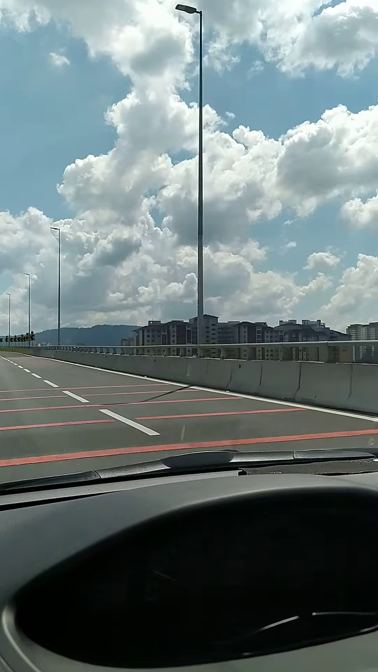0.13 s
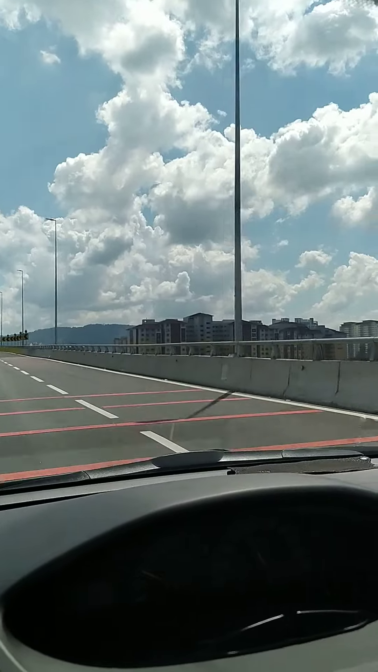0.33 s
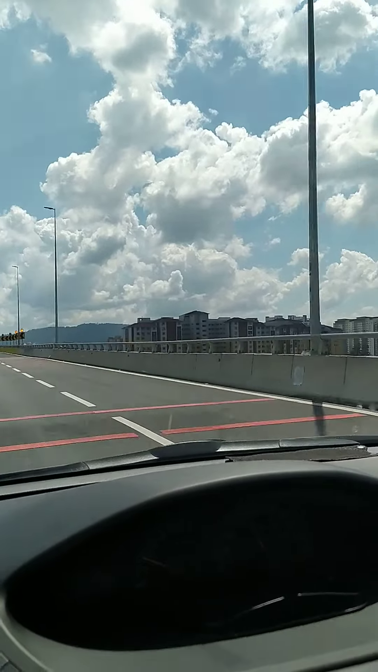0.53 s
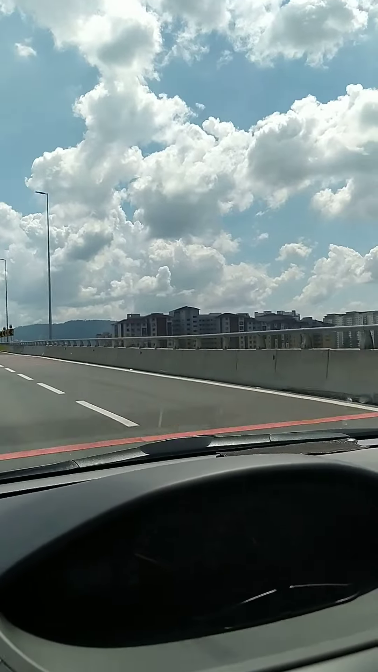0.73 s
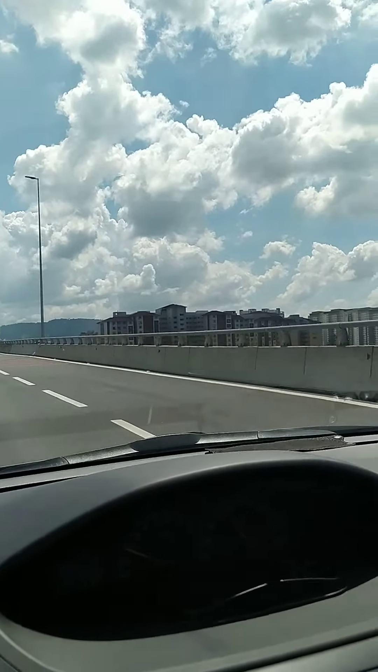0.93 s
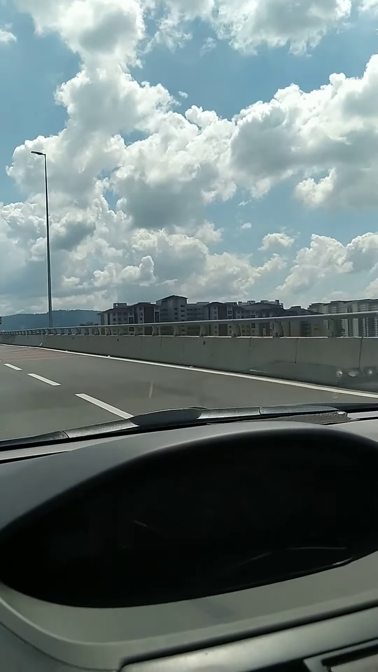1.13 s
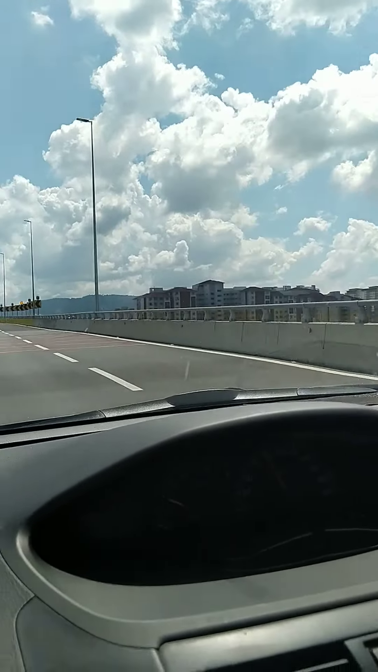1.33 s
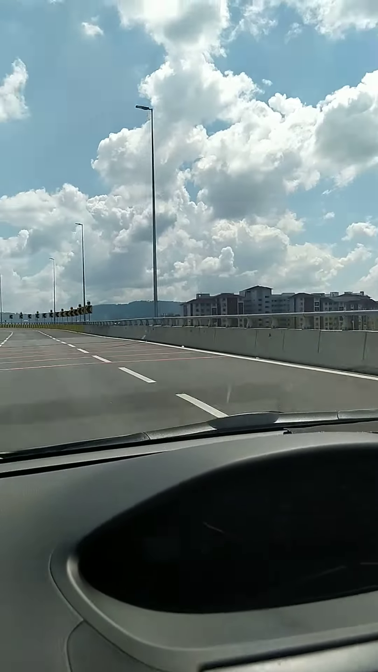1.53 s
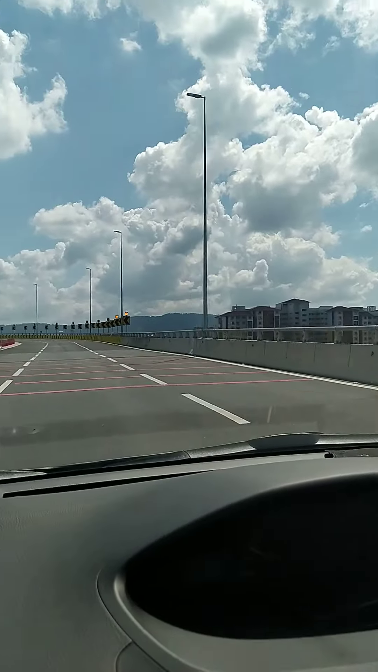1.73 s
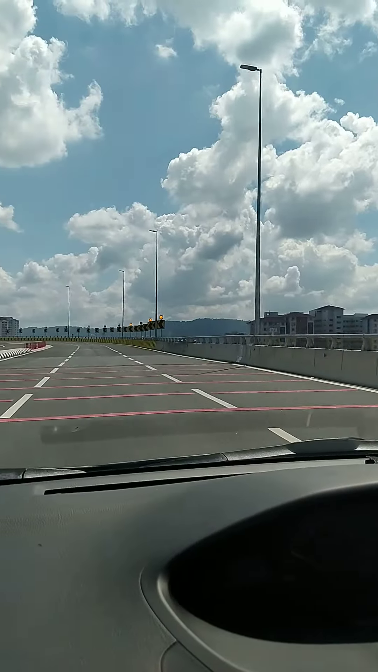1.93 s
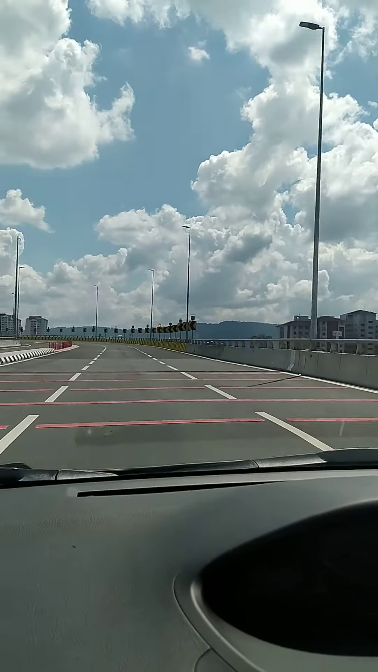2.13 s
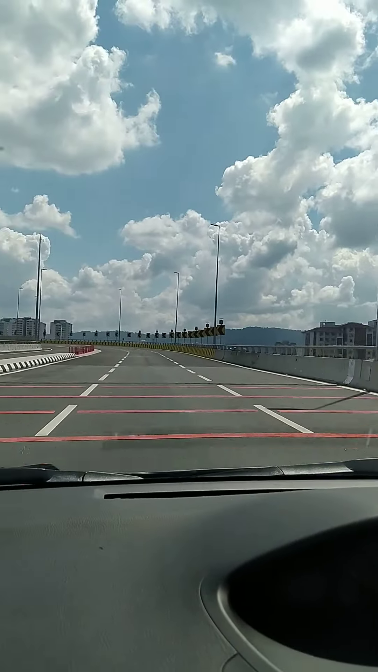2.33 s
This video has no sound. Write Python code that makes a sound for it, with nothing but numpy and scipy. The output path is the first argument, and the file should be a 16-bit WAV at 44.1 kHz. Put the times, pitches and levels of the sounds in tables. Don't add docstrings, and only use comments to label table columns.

```python
import sys
import numpy as np
from scipy import signal
from scipy.fft import rfft, irfft, next_fast_len
from scipy.io import wavfile
from scipy.ndimage import uniform_filter1d

SR = 44100
rng = np.random.default_rng(int(sys.argv[2]) if len(sys.argv) > 2 else 0)


def elevation(decibels):
    levels = np.asarray(decibels, float)
    return 10 ** (levels / 20)


def dump(signal):
    limited = np.clip(np.atleast_2d(signal).T, -1, 1)
    pcm = np.round(limited * 32767).astype(np.int16)
    wavfile.write(sys.argv[1], SR, pcm)


N = 108045
T = np.arange(N) / SR
AXLE_S = .1425


def colour(x, points, share=1):
    p = np.array(points)
    n = next_fast_len(N + 4096)
    f = np.maximum(np.arange(n // 2 + 1) * SR / n, 1)
    gain_db = np.interp(np.log(f), np.log(p[:, 0]), p[:, 1])
    return irfft(rfft(x, n) * elevation(share * gain_db), n)[..., :N]


def level(x, db):
    return x * elevation(db) / np.sqrt(np.mean(x ** 2))


def band(x, hz, width_hz):
    b, a = signal.iirpeak(min(hz, .45 * SR), hz / width_hz, SR)
    return signal.lfilter(b, a, x)


def lowpass(x, order, hz):
    return signal.sosfilt(signal.butter(order, hz, fs=SR, output="sos"), x)


def modes(x, table):
    out = 0
    for hz, db, t60 in table:
        width_hz = np.log(1000) / np.pi / t60
        out = out + elevation(db) * band(x, hz, width_hz) * np.sqrt(t60)
    return out


def pulse(rise, fall):
    return (1 - np.exp(-T / rise)) * np.exp(-T / fall)


def repeat(shape, rows):
    out = np.zeros(N)
    for s, db in rows:
        i = int(max(s, 0) * SR)
        out[i:] += elevation(db) * shape[:N - i]
    return out


def blows(rows, rise, fall):
    return repeat(pulse(rise, fall), rows)


def walk(rate):
    k = int(SR / rate)
    steps = np.repeat(rng.standard_normal(N // k + 1), k)
    return 1.3 * uniform_filter1d(uniform_filter1d(steps, k), k)[:N]


def noise():
    return rng.standard_normal((2, N))


def axle(lag, col, db=0):
    first_s, pitch_s = .445, .1568
    # (slap level [dB], pan shudder level [dB], boom level [dB])
    strips = [
        (7, 2.5, 4.5),
        (7, 5, 6),
        (6, 6, 5),
        (3, -3, 4.5),
        (5.5, 7, 5.5),
        (.6, -3, 4),
    ]
    return [(first_s + lag + k * pitch_s, row[col] + db) for k, row in enumerate(strips)]


def boom():
    # (frequency [Hz], level [dB], t60 [s], rise [s], signed gain)
    boom_modes = [(25.3, -9.5, 1.63, 0.036, -0.81), (35.4, -26, 0.86, 0.025, -1.7),
                  (49.16, -13, 1.27, 0.022, 0.53), (80.2, -14, 0.22, 0.0012, 0.93),
                  (98.2, -23, 0.22, 0.0014, 0.85)]
    # (time [s], level [dB])
    bumps = [
        (1.529, -2.5),
    ]
    hold_s, release_s = .197, .022
    damped = 1 / (1 + np.exp(np.clip((T - hold_s) / release_s * 4, -50, 50)))

    def ring(table):
        out = 0
        for hz, db, t60, rise, sign in table:
            swing = 1000 ** (-T / t60) * (1 - np.exp(-T / rise))
            out = out + sign * elevation(db) * np.sin(2 * np.pi * hz * T) * swing
        return damped * out

    strips = axle(AXLE_S, col=2) + axle(0, col=2, db=-11.5)
    out = repeat(ring(boom_modes), strips) + repeat(ring(boom_modes[2:]), bumps)
    return np.array([out, 0 * out])


def body():
    # (frequency [Hz], level [dB], t60 [s])
    pan_modes = [(112, -4, .18), (154, 1, .22), (190, 0, .18), (242, -3, .22), (292, -8, .12),
                 (340, -10, .14), (415, -12, .14)]
    # (frequency [Hz], level [dB], t60 [s])
    slap_modes = [(350, -6, .05), (415, -3, .07), (630, -5, .06), (520, -7, .05), (712, 0, .07),
                  (775, -1, .07), (900, -6, .04), (1250, -14, .04), (1400, -15, .04)]
    # (time [s], level [dB])
    dash_hits = [(.625, -12), (.804, 2.5), (.841, -3), (.875, -8), (.94, 0), (.957, -3), (1.251, -1),
                 (1.295, -13), (1.427, -0.5), (1.459, -10), (.47, -14), (1.81, -4.5), (1.93, -8.5),
                 (2.19, -10), (2.425, -7)]
    shudders = axle(.02, col=1) + axle(AXLE_S, col=1, db=-7)
    pan = modes(blows(shudders, .022, .022) * noise(), pan_modes)

    hits = axle(0, col=0) + axle(AXLE_S, col=0, db=-8) + dash_hits
    edge = elevation(4) * blows(hits, .0006, .0006)
    slap = modes(blows(hits, .003, .02) * noise() + edge, slap_modes)
    return level(lowpass(pan, 4, 455), -31) + level(lowpass(slap, 4, 1290), -39)


def thuds():
    # (time [s], peak level [dB], frequency [Hz])
    strikes = [(0.459, -18, 171), (0.488, -21.5, 220), (0.51, -17, 172), (0.603, -13.5, 121),
               (0.624, -11, 198.3), (0.649, -12.5, 168.6), (0.721, -13, 147.5), (0.781, -11, 182),
               (0.801, -3.5, 160), (0.851, -12.5, 119), (0.889, -12.5, 144), (0.938, -11, 171),
               (0.968, -11.5, 119.5), (1.029, -22, 149), (1.087, -15.5, 176), (1.117, -19, 123),
               (1.178, -20, 136), (1.246, -15.5, 188.7), (1.279, -14.5, 248.4), (1.31, -28, 155),
               (1.344, -18, 142), (1.403, -12, 164.5), (1.433, -16.5, 166), (1.47, -26, 118),
               (1.506, -16, 163), (1.6, -29, 186)]
    # (time [s], level [dB])
    hum_db = [(1.5, -62), (1.6, -26.5), (1.8, -26), (1.9, -44), (2.0, -56)]
    rise_s, fall_s, upper_ratio = 0.00406, 0.0216, 2.6
    out = np.zeros(N)
    for s, db, hz in strikes:
        low = pulse(rise_s, fall_s) * np.sin(2 * np.pi * hz * T)
        upper = pulse(rise_s, fall_s / 2) * np.sin(2 * np.pi * upper_ratio * hz * T)
        out += repeat(low + elevation(-11.5) * upper, [(s - rise_s, db + 2)])
    hum_hz = 100 * (1 + 0.027 * walk(7.77))
    hum = elevation(np.interp(T, *np.array(hum_db).T)) * np.sin(2 * np.pi * np.cumsum(hum_hz) / SR)
    return np.array([out + hum, out])


def dash():
    # (time [s], peak level [dB], frequency [Hz])
    knocks = [(0.445, -21, 728), (0.461, -25.5, 762), (0.602, -24, 740), (0.61, -24, 690), (0.76, -23, 702),
              (0.804, -22, 585), (0.84, -24, 713), (0.927, -20.5, 703), (0.957, -21, 602),
              (1.072, -21.5, 715), (1.094, -26, 720), (1.113, -27, 648), (1.229, -23, 737),
              (1.251, -21.5, 737), (1.427, -22, 581)]
    rise_s, fall_s = .002, 0.013
    out = np.zeros(N)
    for s, db, hz in knocks:
        ring = pulse(rise_s, fall_s) * np.sin(2 * np.pi * hz * T)
        out += repeat(ring, [(s - rise_s / 2, db - 1)])
    return np.array([out, 0.48 * out])


def trim():
    # (time [s], peak level [dB], extra treble [dB])
    knocks = [(0.4726, -26, 1), (0.608, -26.5, 3.5), (0.639, -18, 2), (0.6663, -24.5, 2), (0.759, -18, 2.5),
              (0.781, -11.5, -3.5), (0.798, -9.5, 0.5), (0.83, -18.5, 4), (0.8707, -12, -4.5),
              (0.9244, -53, 3), (0.9375, -13, 7), (0.941, -6.5, -27), (0.9514, -24, 15), (0.987, -16.5, -1),
              (1.0305, -28.5, 6), (1.077, -21, 3), (1.0934, -19.5, -4), (1.1107, -12.5, 5.5),
              (1.1744, -16.5, -1), (1.2287, -19, 1), (1.2468, -13.5, -13), (1.266, -11.5, 4),
              (1.294, -15.5, -5), (1.3424, -32, 7), (1.3846, -21, 4), (1.4064, -13.5, -2),
              (1.422, -6.5, -1.5), (1.4464, -18, 0.3), (1.475, -23, -5), (1.498, -23, -2)]
    # (frequency [Hz], density [dB per Hz])
    spectrum = [(400, 10.5), (800, -3.5), (1400, -0.5), (2300, -11), (5200, -18), (9600, -12.5),
                (11300, -31.5), (14600, -48), (15400, -58)]
    # (frequency [Hz], width [Hz], level [dB])
    rings = [(2184, 230, 8), (2480, 180, -4), (2684, 46, 13), (3510, 98, 4), (4070, 53, 7), (4620, 33, -1)]
    clicks_per_s, click_spread_db = 5000, 2
    swell_s, tail_s = 0.014, 0.025
    clicks = noise() * (rng.random(N) < clicks_per_s / SR) * elevation(click_spread_db * rng.exponential(size=N))
    grit = level(clicks, 0) + noise()

    def shake(rows):
        early = [(s - swell_s, db) for s, db in rows]
        force = blows(rows, .003, .005) + elevation(-8.5) * blows(early, swell_s, tail_s)
        return elevation(1.8 * walk(200)) * force

    ringing = sum(elevation(db) * band(grit, hz, width) for hz, width, db in rings)
    tone = level(colour(grit, spectrum), 0) + level(ringing, -17.5)
    high = signal.sosfiltfilt(signal.butter(2, 5500, "high", fs=SR, output="sos"), tone)
    dull = shake([(s, db) for s, db, _ in knocks])
    bright = shake([(s, db + extra) for s, db, extra in knocks])
    return elevation(-6.5) * (dull * (tone - high) + bright * high)


def ticks():
    # (time [s], level [dB])
    strikes = [
        (.6418, -44),
        (.7995, -27),
        (.9365, -30),
        (.955, -27),
        (1.1135, -20),
        (1.2665, -24),
        (1.4225, -27.5),
        (2.43, -40),
    ]
    tick_s = 0.00066
    crack = blows(strikes, tick_s / 4, tick_s) * noise()
    mixed = 2.6 * band(crack, 9800, 1300) + 0.54 * band(crack, 6000, 11000)
    return colour(mixed, [(10500, 0), (12500, -12), (16000, -14)])


def rustle():
    # (time [s], length [s], level [dB], frequency [Hz], width [Hz])
    puffs = [
        (0.013, 0.061, -50.5, 7240, 4900),
        (0.056, 0.046, -48, 8150, 4400),
        (2.235, 0.021, -55.5, 9000, 5000),
        (2.425, .025, -59, 12000, 9000),
    ]
    out = 0
    for s, length, db, hz, width in puffs:
        half = length / 2
        envelope = np.exp(-((T - s - half) / half) ** 4)
        scratch = level(band(band(noise(), hz, width), hz, width), 0)
        out = out + elevation(db + 0.7 * walk(255)) * envelope * scratch
    return out


def road():
    # (frequency [Hz], density [dB per Hz])
    roar_spectrum = [(11, -44), (18, 4.5), (75, -10), (112, -3), (152, -8), (189, -8), (332, -16),
                     (367, -18), (2200, -44.5), (2860, -57), (4840, -120)]
    # (frequency [Hz], density [dB per Hz])
    hiss_spectrum = [(1500, -17), (1700, 2.5), (3300, -10), (5200, -10.5), (9700, -1.5), (10900, -16),
                     (11900, -35), (14600, -46), (15300, -60)]
    # (frequency [Hz], width [Hz], level [dB])
    drones = [(43.9, 2.3, -32.5), (109.9, 6.1, -43.5), (126, 1.1, -49), (187, 20, -40), (241, 4.9, -38.5),
              (419.5, 13, -51.5), (770, 195, -50)]
    # (time [s], level [dB])
    rough = [(0, 0.4), (.42, -0.55), (.7, 5.5), (1.45, 7), (1.62, -0.2), (2.1, 0.3), (2.45, 1.4)]
    # (time [s], level [dB])
    heave_db = [(0, -3), (.2, -1.5), (.4, -0.5), (1.6, 0), (1.72, -3.5), (1.85, 4), (2.05, 2.5), (2.15, -2),
                (2.25, -2.5), (2.36, -5.5), (2.45, -7)]
    roar = level(colour(noise(), [(9, -58)] + list(roar_spectrum) + [(4000, -168)]), -25)
    edges = 20 * 2. ** np.arange(8)
    lows = [signal.sosfiltfilt(signal.butter(2, f, fs=SR, output="sos"), roar) for f in edges[1:]]
    roar = sum((b - a) * elevation(1.8 * walk(9)) for a, b in zip([0] + lows, lows + [roar]))
    heave = elevation(np.interp(T, *np.array(heave_db).T))
    roar = roar + lows[1] * (heave - 1)
    drone = 0
    for hz, width, db in drones:
        drone = drone + level(band(noise(), hz, width), db) * (heave if hz < 60 else 1)
    hiss = level(colour(noise(), [(700, -36)] + list(hiss_spectrum) + [(16500, -70)]), -55.5)
    return elevation(np.interp(T, *np.array(rough).T)) * (roar + drone) + elevation(0.2 * walk(5.9)) * hiss


def scene():
    # (frequency [Hz], gain [dB])
    side_gain = [(60, -25), (110, -23), (200, -19), (380, -8), (700, -5), (1290, 0), (8000, .5), (15000, 0)]
    # (frequency [Hz], ratio [dB])
    left_gain = [(60, 0.5), (110, -1.5), (200, -0.5), (380, -6), (700, 4.5), (1290, 1.5), (2380, 0),
                 (4400, 1), (8120, -4.5), (12000, -17.5), (15000, -27)]
    mid, side = boom() + body() + trim() + rustle() + road() + thuds() + ticks() + dash()
    side = colour(side, side_gain)
    left = colour(mid + side, left_gain, 0.59)
    right = colour(mid - side, left_gain, -0.24)
    return np.array([left, right])


def band_limit(x):
    return signal.sosfilt(signal.butter(12, 15730, fs=SR, output="sos"), x)


def record(dry):
    rounded = np.tanh(1.156 * dry) / 1.409
    top_cut = signal.ellip(8, .2, 70, 15750, fs=SR, output="sos")
    return band_limit(signal.sosfilt(top_cut, rounded))


dry = scene()
out = record(dry)
dump(out)
```